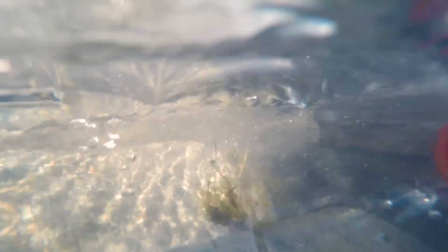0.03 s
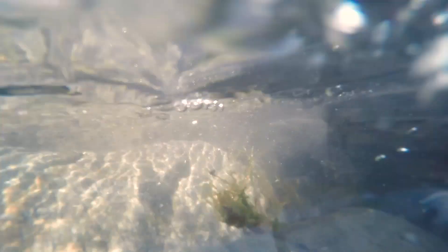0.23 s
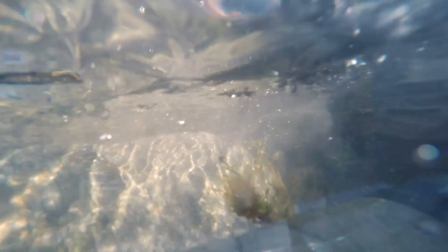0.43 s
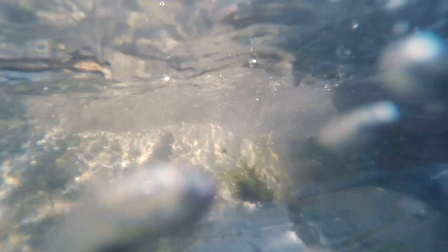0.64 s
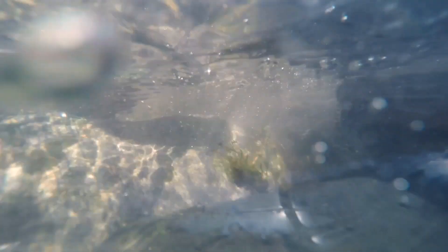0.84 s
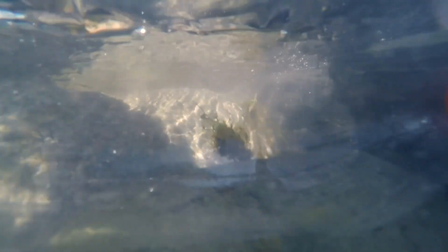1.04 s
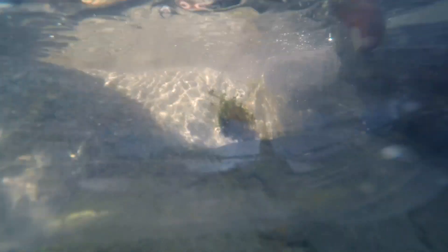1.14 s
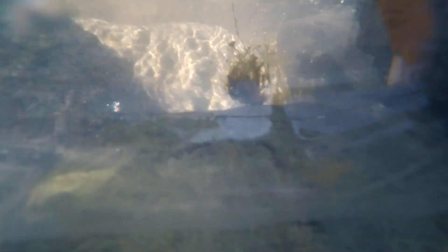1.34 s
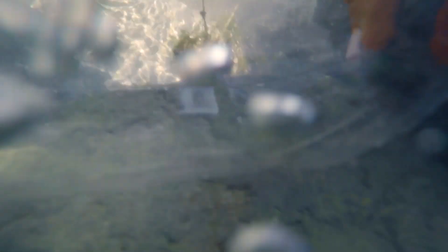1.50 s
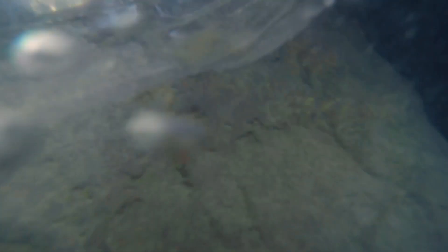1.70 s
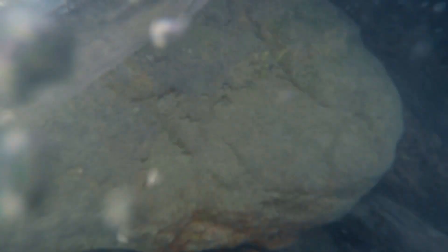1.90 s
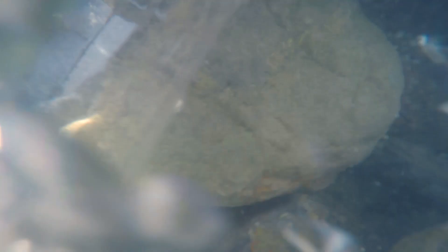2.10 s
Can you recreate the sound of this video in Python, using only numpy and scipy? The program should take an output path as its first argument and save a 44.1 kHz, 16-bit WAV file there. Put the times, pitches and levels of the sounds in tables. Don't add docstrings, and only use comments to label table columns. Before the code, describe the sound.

A muffled stream rush and low eddies thump a submerged, cased microphone; a sharp clack, then a fizzing bubble burst with hard knocks, heavy low slaps, and finally a quieter, clearer water rush.

```python
import sys
import numpy as np
from scipy import signal
from scipy.io import wavfile
from scipy.ndimage import uniform_filter1d

SR = 44100
rng = np.random.default_rng(int(sys.argv[2]) if len(sys.argv) > 2 else 0)


def field_ratio(decibels):
    return 10 ** (np.asarray(decibels, dtype=float) / 20)


def transcribe(signal):
    frames = np.atleast_2d(signal).T
    limited = np.clip(frames, -1, 1)
    pcm = np.round(limited * 32767).astype(np.int16)
    wavfile.write(sys.argv[1], SR, pcm)


N = 94815
PUFF_N = 4000

# (frequency [Hz], level [dB])
SHELL_PASS = [(350, -31), (600, -7.5), (795, -15), (1160, -3), (1790, -1), (2060, -9), (4000, -20.5),
              (4460, -32), (8000, -40), (10400, -63), (17600, -120)]


def evened(x):
    return x / np.sqrt(np.mean(x ** 2) + 1e-20)


def read(points, hz):
    f, db = np.transpose(points)
    return np.interp(np.log(hz + 1), np.log(f + 1), db, left=-90, right=-90)


def curve(table, axis):
    columns = np.transpose(table)
    return np.interp(np.arange(N) / SR, columns[0], columns[axis])


def add(mix, s, sound):
    part = mix[round(s * SR):][:len(sound)]
    part += sound[:len(part)]


def resonate(x, hz, width_hz):
    turn = np.exp(2j * np.pi * np.cumsum(hz * np.ones(len(x))) / SR)
    r = np.exp(-np.pi * width_hz / SR)
    return 2 * (turn * signal.lfilter([1 - r], [1, -r], x / turn)).real


def noise(points, size, patchy_db, flicker_db):
    frames, hz = N // (size // 4) + 5, np.fft.rfftfreq(size, 1 / SR)
    real, imag, patches = rng.standard_normal((frames, len(hz), 3)).T
    patches = uniform_filter1d(patches, size=6, axis=0)
    patches = evened(uniform_filter1d(patches, size=6, axis=1))
    flicker = evened(uniform_filter1d(rng.standard_normal(frames), size=4))
    level_db = read(points, hz)[:, None] + patchy_db * patches + flicker_db * flicker
    z = (real + 1j * imag) * field_ratio(level_db)
    return evened(signal.istft(z, nperseg=size, noverlap=size - size // 4)[1][:N])


def ring(hz, t60_s, rise_s, glide):
    t = np.arange(0, t60_s + rise_s, 1 / SR)
    rise = np.sin(np.pi / 2 * np.minimum(t / rise_s, 1)) ** 2
    decay = field_ratio(-60 * np.maximum(t - rise_s, 0) / t60_s)
    return rise * decay * np.sin(2 * np.pi * hz * (t + glide * t ** 2 / t60_s))


def fluttered(tone, puff):
    flutter = 1 + 0.14 * evened(signal.oaconvolve(puff, np.hanning(60), "same"))
    return tone * flutter[:len(tone)]


def snap_and_scrape(hz, puff):
    t = np.arange(len(puff)) / SR
    t60_s = 0.014 * (hz / 2000) ** -0.56
    drive = (t == 0) + 0.75 * puff * field_ratio(-60 * t / t60_s) * np.sqrt(hz / SR)
    body = drive
    for _ in range(3):
        body = resonate(body, hz, hz)
    thud = resonate(resonate(drive, hz / 3, hz / 2), hz / 3, hz / 2) * 2
    body = body + field_ratio(-4) * thud
    return body / abs(body).max()


def fizz(per_s, spread_db, count):
    hit = (rng.random(N) < per_s / SR) * field_ratio(spread_db * np.minimum(rng.exponential(1, N), 5))
    which, out = rng.integers(0, count, N), np.zeros(N)
    for k, hz in enumerate(np.geomspace(700, 6500, count)):
        bubble = field_ratio(read(SHELL_PASS, hz)) * ring(hz, 14 / hz, 0.92 / hz, 0.06)
        out += signal.oaconvolve(hit * (which == k), bubble)[:N]
    return evened(out)


def buffeting():
    # (time [s], level [dB], deep share [0-1])
    surge = [(0, -33.5, 0.24), (.05, -31.5, 0.46), (.2, -25.5, 0.39), (.42, -20, 0.46), (.52, -18.5, 0.54),
             (.72, -17, 0.55), (.96, -14, 0.61), (1.15, -16.5, 0.4), (1.26, -10.5, 0.53), (1.42, -12, 0.69),
             (1.5, -21.5, 0.62), (1.6, -17.5, 0.73), (1.76, -20.5, 0.68), (1.8, -24.5, 0.83),
             (1.98, -27.5, 0), (2.07, -35.5, 0.15), (2.15, -29, 0.1)]
    # (frequency [Hz], level [dB per Hz])
    quick_eddies = [(15, 2), (110, -4.5), (250, -24), (400, -37.5), (600, -64)]
    deep_eddies = [(15, -7), (50, -1.5), (125, -12), (220, -37.5), (400, -61.5)]
    # (centre [s], peak [dB], frequency [Hz], half length [cycles])
    slaps = [(0.25, -13.5, 128, 3.3), (.78, -9.5, 49, 1.7), (1.251, 0.5, 60, 1.73), (1.233, -13, 200, 1),
             (1.393, -2, 84, 1.8), (1.419, -6, 105, 2.2), (1.446, -2, 51, 1.04), (1.592, -7.5, 50, 1.3),
             (1.558, -12, 41, 1.2), (1.756, -11, 45, 1.8), (1.64, -14.5, 112, 3)]
    share = np.clip(curve(surge, axis=2), 0, 1)
    quick = (1 - share) * noise(quick_eddies, size=4096, patchy_db=0.52, flicker_db=-0.3)
    deep = share * noise(deep_eddies, size=4096, patchy_db=3.4, flicker_db=4.05)
    out = evened(quick + deep) * field_ratio(curve(surge, axis=1) + 1.0)
    for s, db, hz, cycles in slaps:
        t = np.arange(-cycles / hz, cycles / hz, 1 / SR)
        swell = np.exp(-4.5 * (t * hz / cycles) ** 2)
        add(out, s + t[0], field_ratio(db - 0.5) * swell * np.cos(2 * np.pi * hz * t))
    return out


def rush():
    # (time [s], through the shell [dB], open water [dB], gurgle [dB])
    flow = [(0, -52.5, -68, -57), (.3, -45, -68, -48), (.72, -40, -57, -41.5), (.96, -37, -42, -32),
            (1.2, -40.5, -54, -35), (1.35, -38.5, -62, -33.5), (1.5, -44, -56, -43.5),
            (1.78, -52.5, -63.5, -54.5), (1.98, -50, -51.5, -45), (2.07, -55.5, -42.5, -55),
            (2.15, -46.5, -39.5, -43)]
    # (frequency [Hz], level [dB])
    gurgle_spectrum = [(120, 1), (240, 0), (420, -2), (650, -13), (1100, -32)]
    hiss_spectrum = [(3000, -17), (4500, 3), (13000, -1), (15000, -3), (15600, -30.5)]
    open_spectrum = [(290, -45.5), (500, -14.5), (984, -3), (1470, -8), (1660, -7), (9000, -39.5),
                     (11700, -71.5), (19800, -120)]
    shell_db = curve(flow, axis=1)
    roar = noise(SHELL_PASS, size=512, patchy_db=2.0, flicker_db=2.2)
    muffled = roar + field_ratio(-4.5) * fizz(per_s=2800, spread_db=4.5, count=30)
    muffled = muffled * field_ratio(shell_db - 0.25)
    gurgle = noise(gurgle_spectrum, size=1024, patchy_db=3.0, flicker_db=0.0)
    gurgle = gurgle * field_ratio(curve(flow, axis=3) + 2.5)
    hiss = noise(hiss_spectrum, size=512, patchy_db=1, flicker_db=1)
    hiss = hiss * field_ratio(-70.5 + 0.45 * (shell_db + 45))
    open_water = noise(open_spectrum, size=512, patchy_db=2.7, flicker_db=0.5)
    return muffled + gurgle + hiss + open_water * field_ratio(curve(flow, axis=2))


def grit():
    # (time [s], peak [dB], centre [Hz])
    grains = [(0.1023, -27, 3060), (0.224, -28.5, 1640), (0.2736, -36.5, 3500), (0.424, -33.5, 3500),
              (.4234, -36, 11500), (.2468, -47, 8600), (.3586, -49, 11500), (1.2062, -42, 11000),
              (1.8058, -49, 14000), (.9835, -33.5, 9500), (1.636, -42, 3000), (.812, -32, 4000),
              (.8944, -49, 3500), (0.937, -23, 2740), (0.948, -34, 12000), (0.9575, -29.5, 7000),
              (1.005, -33.5, 12740), (1.012, -32, 9000), (1.0159, -21.5, 5000), (1.0245, -21.5, 9400),
              (1.0443, -36, 2550), (1.074, -19, 5000), (1.3832, -27, 4000), (1.4365, -25, 4000),
              (.1013, -30, 13500), (1.505, -38, 5000), (1.5658, -34.5, 3500), (1.953, -48, 4460),
              (2.096, -35, 13600), (2.1165, -26, 6500), (2.136, -36, 13500)]
    out = np.zeros(N)
    for s, db, hz in grains:
        add(out, s, field_ratio(db) * snap_and_scrape(hz, rng.standard_normal(PUFF_N)))
    return out


def scuffs():
    # (time [s], peak [dB], centre [Hz], t60 [s])
    rubs = [(.2245, -30, 1500, .015), (.6152, -23, 1300, .012), (.619, -22, 1500, .015),
            (.647, -35, 2800, .01), (.8118, -29, 1900, .02), (.863, -35, 2500, .01), (.934, -31, 2200, .03),
            (.948, -17, 1500, .035), (.957, -24, 1900, .025), (.9752, -16, 1300, .06),
            (1.022, -17, 1000, .05), (1.0375, -20, 1700, .03), (1.044, -25, 2400, .025),
            (1.0745, -21, 2200, .015), (1.383, -18, 1800, .014), (1.383, -24, 750, .02),
            (1.4335, -32, 3000, .015), (1.4365, -22, 2300, .012), (1.483, -27, 1500, .025),
            (1.635, -32, 1200, .012), (.1018, -34, 2900, .008), (1.5525, -24, 2200, .02),
            (1.023, -20, 4200, .015)]
    out, t = np.zeros(N), np.arange(PUFF_N) / SR
    width, rise_s = 1.1, 0.0006
    for s, db, hz, t60_s in rubs:
        drive = rng.standard_normal(PUFF_N) * np.minimum(t / rise_s, 1) * field_ratio(-60 * t / t60_s)
        edges_hz = [hz / (1 + width), hz * (1 + width / 2)]
        band = signal.butter(3, edges_hz, "band", fs=SR, output="sos")
        body = signal.sosfilt(band, drive)
        add(out, s, field_ratio(db) * body / abs(body).max())
    return out


def pings():
    # (time [s], peak [dB], frequency [Hz])
    bubbles = [(0.1019, -23.5, 10860), (0.224, -35, 6830), (.3726, -43, 4440), (0.7672, -37.5, 5600),
               (.937, -41, 6300), (0.948, -25, 2100), (0.957, -28, 1700), (0.9629, -16, 4080),
               (0.9662, -31, 4310), (0.963, -21.5, 2180), (.9752, -16, 2610), (0.978, -15.5, 922),
               (0.9783, -32, 7600), (0.9828, -35, 7980), (.983, -24.5, 2280), (1.017, -25, 2170),
               (1.0375, -23, 2080), (1.0378, -24, 2950), (1.636, -33.5, 976), (1.695, -39.5, 2960),
               (1.5535, -29, 1580)]
    out = np.zeros(N)
    for s, db, hz in bubbles:
        t60_s = 0.024 * (hz / 2000) ** -0.83
        tone = ring(hz, t60_s, rise_s=0.0007, glide=0.018)
        add(out, s, field_ratio(db) * fluttered(tone, rng.standard_normal(PUFF_N)))
    return out


def pebbles():
    # (time [s], peak [dB], rise [s])
    knocks = [
        (1.022, -5.5, 0.0035),
        (1.0603, -3, 0.001),
        (1.5523, -14.5, .0005),
        (.6144, -3, 0.0008),
        (.6189, -8, 0.0003),
    ]
    # (frequency [Hz], level [dB], t60 [s])
    knock_modes = [
        [(840, -18.5, 0.06), (1280, -4.5, 0.022), (2190, -0.5, 0.014), (4330, -21, 0.0083)],
        [(1342, -4.5, 0.013), (2480, -1, 0.008), (3050, -4, .007), (4660, -7.5, 0.011), (5700, -9, 0.006),
         (3800, -8, .006), (7160, -9.5, 0.006)],
        [(2900, -4, 0.0076), (3210, -9, 0.017), (5120, -26, 0.0019)],
        [(3630, -3, 0.0055), (4400, -15, .003), (1700, -16, 0.008)],
        [(6770, 1, 0.003), (3200, -4.5, 0.009), (5600, -10.5, .007)],
    ]
    out = np.zeros(N)
    for (s, db, rise_s), modes in zip(knocks, knock_modes):
        puff = rng.standard_normal(PUFF_N)
        mean_hz = np.mean(modes, axis=0)[0]
        add(out, s, field_ratio(db - 13.5) * snap_and_scrape(mean_hz, puff))
        for hz, mode_db, t60_s in modes:
            tone = ring(hz, min(t60_s, 0.06), rise_s, glide=0)
            add(out, s, field_ratio(db + mode_db) * fluttered(tone, puff))
    return out


def blips():
    # (centre [s], peak [dB], frequency [Hz], half length [cycles])
    pinches = [(.8208, -23, 2544, 11), (.851, -30, 1090, 5), (.8075, -31, 1000, 3), (1.102, -39, 3950, 22),
               (1.19, -27, 270, 4), (1.222, -24, 260, 4), (1.25, -23, 280, 5), (1.35, -29, 380, 6),
               (1.386, -21, 220, 2), (1.29, -30, 270, 5), (1.946, -40, 3300, 18), (1.68, -39, 950, 5),
               (1.4375, -25, 3550, 8), (1.9, -30, 200, 3), (1.965, -30, 220, 4), (2.0, -33, 210, 3),
               (1.49, -38, 450, 5), (1.46, -40, 2600, 9), (1.494, -39, 2650, 10)]
    out = np.zeros(N)
    for s, db, hz, cycles in pinches:
        t = np.arange(-cycles / hz, cycles / hz, 1 / SR)
        swell = np.exp(-4.5 * (t * hz / cycles) ** 2)
        add(out, s + t[0], field_ratio(db) * swell * np.sin(2 * np.pi * hz * t * (1 + 3.0 * t)))
    return out


def splash():
    # (start [s], end [s])
    span_s = (0.935, .99)
    corners_s = [span_s[0] - 0.01, span_s[0], span_s[1], span_s[1] + 0.02]
    gate = np.interp(np.arange(N) / SR, corners_s, [0, 1, 1, 0])
    return field_ratio(-35) * gate * fizz(per_s=1400, spread_db=4.0, count=20)


def whistles():
    # (start [s], length [s], level [dB], start [Hz], top [Hz], end [Hz])
    seam = [
        (1.1, 0.125, -55, 4100, 4650, 4150),
        (1.22, .1, -58, 4100, 4050, 3850),
        (1.586, .12, -48.5, 2550, 2600, 2850),
        (1.445, .075, -50, 2600, 2550, 2700),
    ]
    out = np.zeros(N)
    for s, length_s, db, a_hz, top_hz, b_hz in seam:
        u = (np.arange(0, length_s, 1 / SR) / length_s) ** 0.5
        bend_hz = 2 * top_hz - (a_hz + b_hz) / 2
        hz = a_hz * (1 - u) ** 2 + 2 * bend_hz * u * (1 - u) + b_hz * u ** 2
        x = rng.standard_normal(8820)[:len(u)]
        x = resonate(resonate(x, hz, 400), hz, 400)
        flutter = evened(uniform_filter1d(rng.standard_normal(8820), size=200))
        x = x * field_ratio(2 * flutter[:len(u)])
        add(out, s, field_ratio(db) * evened(x) * np.sin(np.pi * u) ** 0.4)
    return out


def scene():
    water = buffeting() + rush() + splash() + whistles()
    hits = grit() + scuffs() + pings() + pebbles() + blips()
    return (water + hits)[None]


def roll_off(x):
    return signal.sosfilt(signal.butter(12, 16850, fs=SR, output="sos"), x)


def record(dry):
    soft = np.tanh(0.9 * dry) * 1.12
    limited = signal.oaconvolve(soft, signal.firwin(255, 16300, fs=SR)[None], "same")
    return roll_off(limited)


dry = scene()
out = record(dry)
transcribe(out)
```